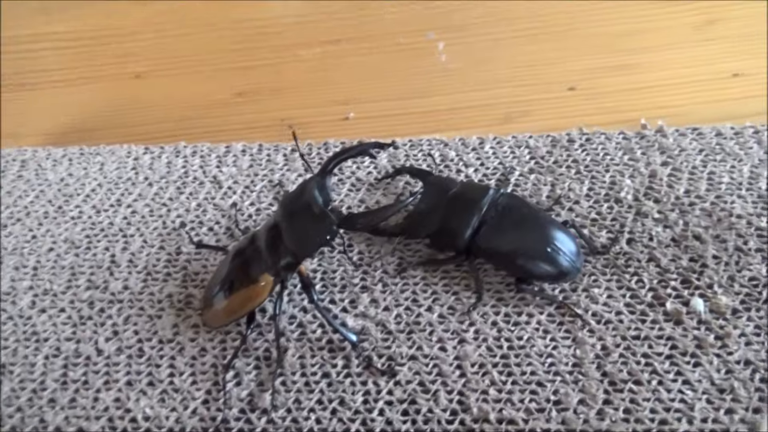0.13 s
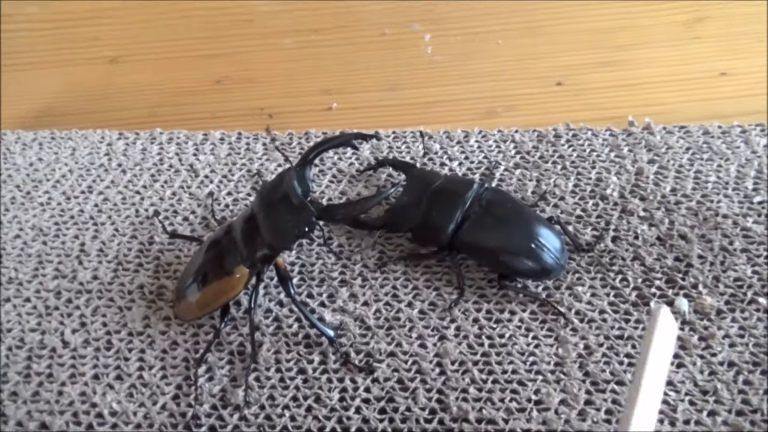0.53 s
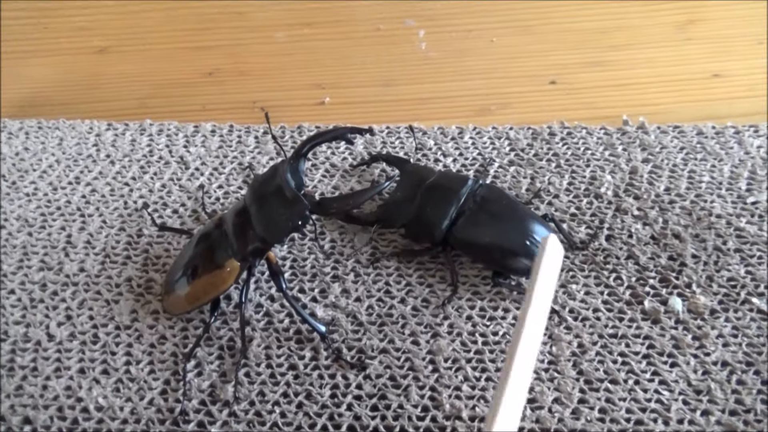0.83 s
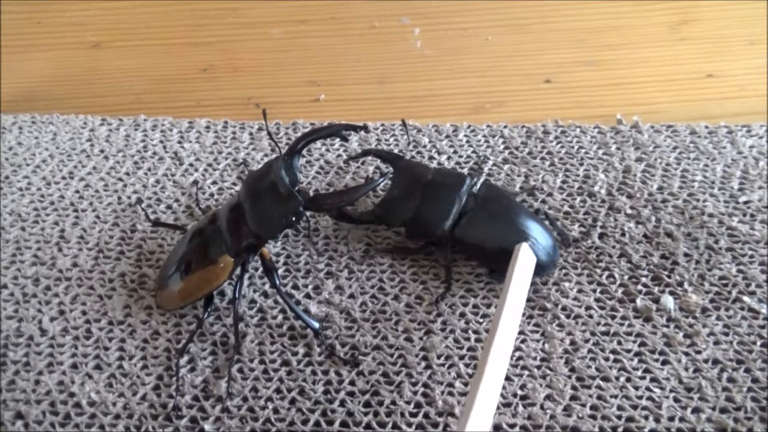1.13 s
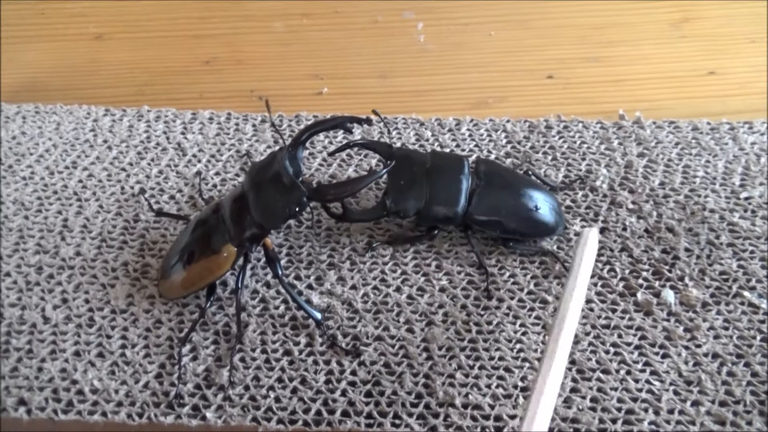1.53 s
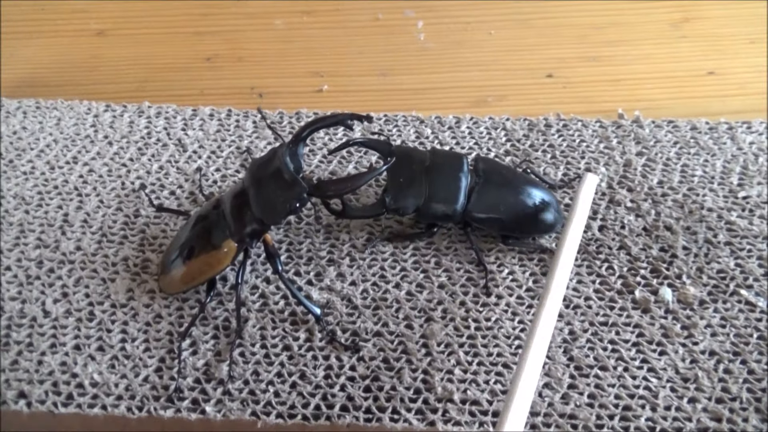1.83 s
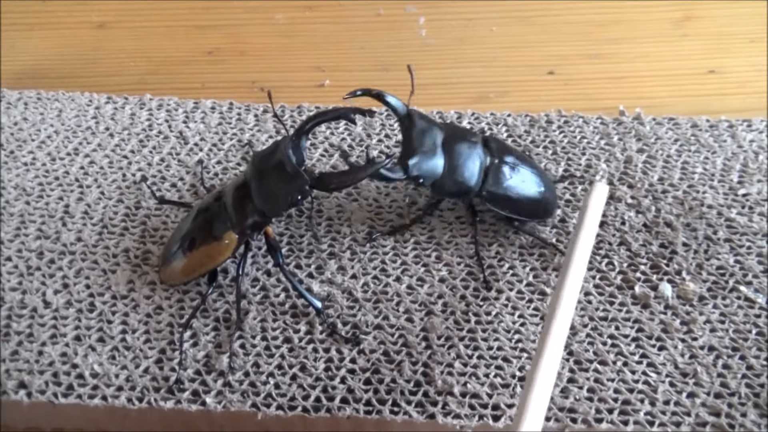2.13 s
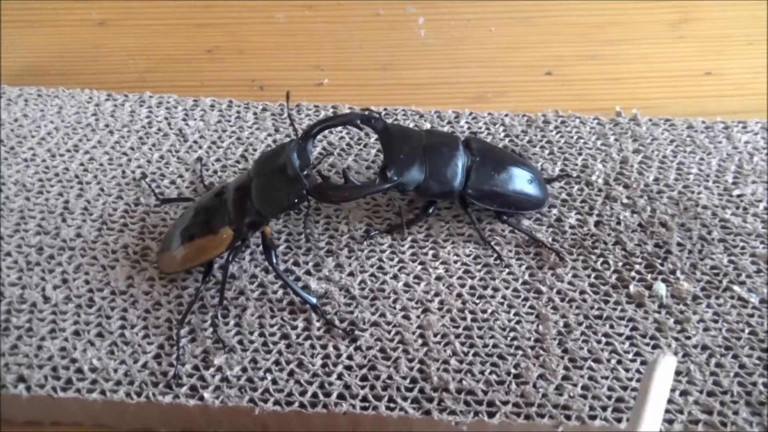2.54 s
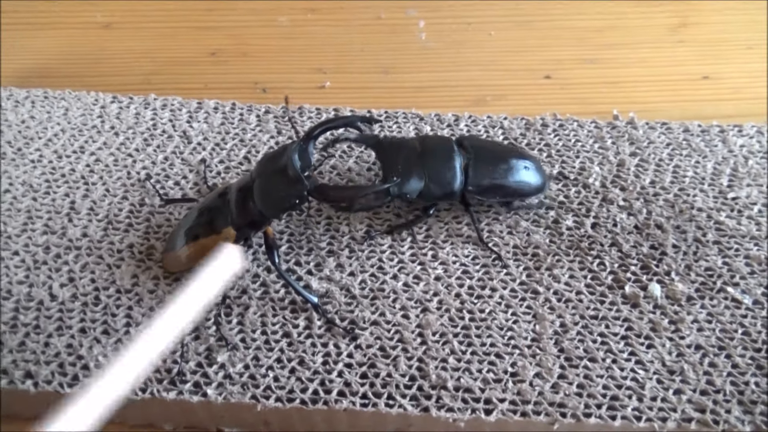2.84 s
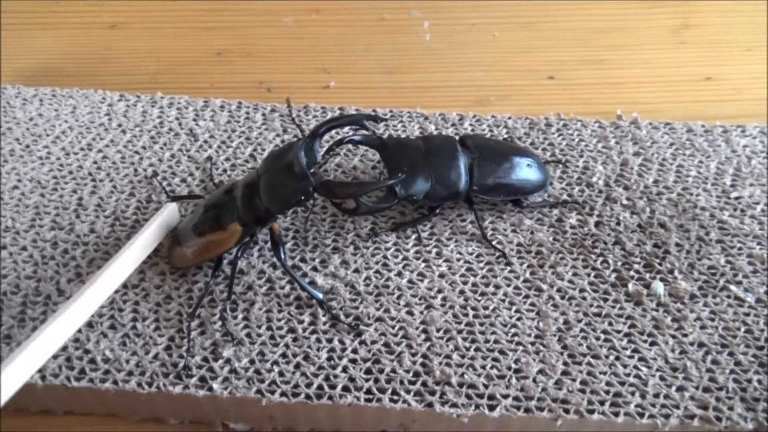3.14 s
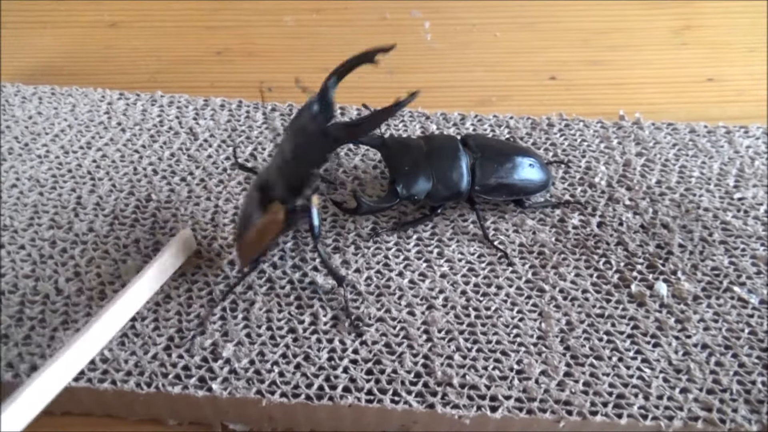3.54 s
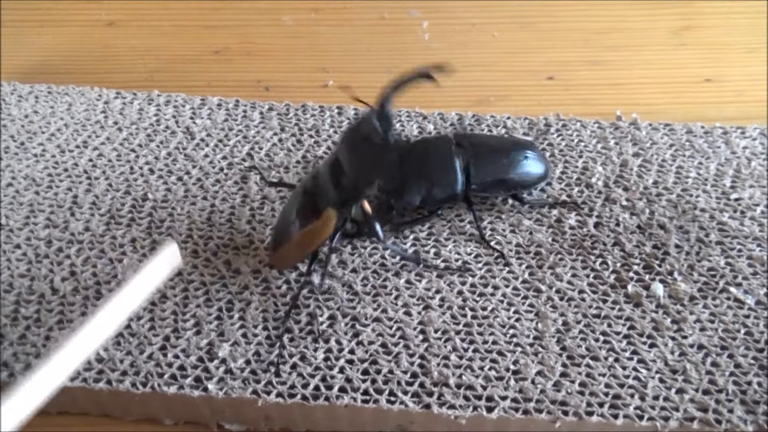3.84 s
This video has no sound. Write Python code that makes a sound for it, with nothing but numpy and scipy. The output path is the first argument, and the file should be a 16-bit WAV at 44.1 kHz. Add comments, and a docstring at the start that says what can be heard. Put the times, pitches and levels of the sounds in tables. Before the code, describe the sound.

Beetle claws and a prodding stick rasp briefly over coarse weave, jaws and shells tick sharply, and light shoves knock the table. Mostly quiet early, crowded at the end, heard very close in a small, softly humming room.

```python
"""On a rough mat on a wooden table, two stag beetles wrestle while a stick prods them, close to the microphone.
Claws and stick rasp over the weave as coloured friction noise; hooked claws chatter in rows of ringing slips.
Jaws and shells click as short high rings, shoves thump the table's modes, and a rustle and faint squeak pass.
The room's dull rush, noise with wavering resonances, follows a hollow click and gradually grows."""
import sys
import numpy as np
from scipy import signal
from scipy.fft import rfft, irfft, next_fast_len
from scipy.io import wavfile
from scipy.ndimage import uniform_filter1d, map_coordinates

SR = 44100
rng = np.random.default_rng(int(sys.argv[2]) if len(sys.argv) > 2 else 0)


def put_to_file(sound):
    """Save the sound as 16-bit audio at rate SR, in the file named by the first command-line argument."""
    columns = np.atleast_2d(sound).T  # one column per channel
    safe = np.clip(columns, -1, 1)
    whole_steps = np.round(safe * 32767)
    wavfile.write(sys.argv[1], SR, whole_steps.astype(np.int16))


N = 176400

# claws and stick dragging over the weave [t/s, length/s, rasp level/dB, fizz level/dB]
SCRAPES = [(1.12, 0.05, -52, -50), (1.182, 0.011, -48.5, -55), (1.212, 0.082, -55, -72),
           (1.337, 0.054, -68, -68), (1.617, .043, -60, -78), (1.898, 0.025, -45.5, -54),
           (1.927, 0.093, -46, -57.5), (2.082, 0.0053, -40, -46), (2.135, 0.063, -47.5, -53),
           (2.193, 0.016, -46, -48), (2.232, 0.043, -51, -71), (2.352, 0.0058, -42.5, -43.5),
           (3.048, 0.024, -45, -58), (3.108, 0.082, -51.5, -68), (3.423, 0.033, -46.5, -57),
           (3.449, 0.039, -43, -47), (3.469, 0.0069, -31.5, -45), (3.479, 0.0039, -30.5, -35),
           (3.4899, 0.0088, -30.5, -36), (3.5, 0.031, -42, -58), (3.513, .005, -49, -37),
           (3.544, 0.055, -47.5, -58), (3.57, 0.0044, -67, -39), (3.603, 0.033, -45, -45),
           (3.72, 0.054, -42.5, -45), (3.77, 0.0036, -52, -23), (3.774, 0.01, -53, -24),
           (3.812, 0.015, -36.5, -44), (3.829, 0.019, -41, -37), (3.85, 0.043, -50, -52),
           (3.921, 0.0097, -45.5, -41), (3.9383, 0.0021, -41, -29), (3.963, 0.011, -45, -53),
           (3.9945, 0.019, -25, -29)]
# a hooked claw chattering across the fibres [t/s, length/s, level/dB, f/Hz]
SCRATCHES = [(2.080, 0.0052, -39, 3370), (1.952, 0.052, -57.5, 6500), (3.043, 0.013, -50.5, 4670),
             (3.171, .028, -55, 3800), (3.447, 0.023, -43, 5560), (3.472, .005, -32.5, 4240),
             (3.479, 0.0052, -42, 1380), (3.773, 0.015, -41, 4760), (3.8, 0.021, -45.5, 1660),
             (3.842, 0.0058, -44, 2700), (3.925, .012, -43, 3800), (3.995, 0.0088, -34.5, 3600)]
# hard contacts of jaws, claws and shells [t/s, ring level/dB, f/Hz, t60/s]
CLICKS = [(1.108, -40, 10000, .003), (1.1692, -22.5, 4500, 0.00046), (1.293, -50, 12300, .003),
          (1.8995, -24, 5050, 0.00045), (2.0862, -11.5, 11000, 0.0014), (2.1375, -27.5, 12100, 0.0026),
          (2.1497, -24, 11400, 0.0018), (2.1909, -13.5, 13100, 0.0019), (2.3545, -30.5, 3560, 0.0038),
          (2.3565, -29, 1580, 0.0043), (3.0595, -28, 2880, 0.003), (3.471, -13, 8000, 0.0012),
          (3.4795, -28, 8900, .0012), (3.4905, -18, 4020, 0.002), (3.515, -26, 3400, 0.015),
          (3.5202, -13.5, 7640, 0.00096), (3.564, -27, 4940, 0.0014), (3.5722, -22, 11900, .004),
          (3.6505, -17, 12900, 0.0024), (3.6616, -14.5, 9050, 0.00033), (3.6929, -17, 3440, 0.0017),
          (3.6935, -33, 2100, 0.012), (3.7155, -23.5, 4120, 0.00091), (3.744, -23, 12600, .002),
          (3.7499, -10, 10700, 0.002), (3.751, -9.5, 11600, 0.0013), (3.7705, -17, 9600, 0.0067),
          (3.8527, -10.5, 6830, 0.0015), (3.8867, -20.5, 8500, 0.00094), (3.9307, -12.5, 5070, 0.0007),
          (3.9601, -10.5, 11300, 0.00055)]
# shoves that reach the table [t/s, peak level/dB, f/Hz where the shove is strongest]
THUMPS = [(1.628, -31.5, 385), (2.033, -30, 220), (2.088, -28.5, 218), (2.149, -33, 225),
          (2.358, -42.5, 273), (2.517, -36.5, 267), (3.053, -33, 290), (3.470, -28, 366),
          (3.485, -20.5, 284), (3.565, -24, 245), (3.626, -32, 270), (3.74, -36, 284), (3.763, -31.5, 233),
          (3.855, -38, 256), (3.936, -36, 276)]
# modes of the table, before the push favours some of them [f/Hz, level/dB, t60/s]
TABLE_MODES = [(176, 1, 0.034), (212.8, -2.5, 0.17), (275.3, 0, 0.19), (322, 3, 0.054), (389, -12, 0.13),
               (540, -4, 0.022), (1002, -8.5, 0.11), (1814, -1, 0.022)]
# relative spectrum of the rough rasp [f/Hz, level/dB]
RASP_COLOUR = [(40, -50), (150, -23), (500, 1.5), (1000, 4.5), (1700, 6), (2400, 2.5), (3800, 1),
               (6200, 0.5), (9000, -3), (16000, -5.5)]
# relative spectrum of the bright fizz [f/Hz, level/dB]
FIZZ_COLOUR = [(1500, -73), (3500, -66), (4500, -6), (7500, -7), (9500, 4.5), (12500, 8), (15000, 0),
               (16500, 0.5)]
# spectrum of cracks and random ticks [f/Hz, level/dB]
CRACK_COLOUR = [(40, -45), (150, -30), (600, -16), (1700, -36), (2500, -5), (4000, 8.5), (7000, 4),
                (12000, 12), (16000, -1)]
# relative spectrum of the soft rustle [f/Hz, level/dB]
RUSTLE_COLOUR = [(300, -20), (1000, -2), (1600, 0.5), (3800, -7.5), (6500, -5.5), (9000, 0), (12500, 3),
                 (16000, -9)]
# swell of the rustle [t/s, level/dB]
RUSTLE_LEVEL = [(2.42, -76), (2.52, -54.5), (2.56, -54), (2.585, -45), (2.63, -52), (2.74, -52.5),
                (2.83, -68)]
# relative spectrum of the room's rush [f/Hz, level/dB]
ROOM_COLOUR = [(20, -31), (55, -15.5), (88, -12), (125, -7), (180, -3), (260, -1), (400, -6), (600, -9),
               (900, -12.5), (1250, -19), (1500, -14), (2100, -22.5), (3500, -24.5), (6000, -27),
               (10000, -30.5), (16000, -30)]
# resonances in the rush, against its noise [f/Hz, width/Hz, level/dB]
DRONE = [(93, 11, -12), (220.2, 8, -9.5), (282.5, 7.9, -10.5), (476, 11.4, -11), (1011, 39, -10.5)]
# course of the rush [t/s, level/dB]
RUSH_LEVEL = [(.1, -54), (.9, -52), (1.35, -50), (1.85, -49), (2.15, -47), (2.9, -46.5), (3.3, -47.5),
              (4, -46)]
# stereo width of the fight: side against mid [f/Hz, level/dB]
FIGHT_SIDE = [(150, -13), (300, -26), (2000, -40), (9000, -15), (15000, -39)]
# stereo width of the room: side against mid [f/Hz, level/dB]
ROOM_SIDE = [(30, -24), (250, -24), (1200, -13.5), (2500, -37), (9000, -10.5), (15000, -45)]

# friction: tiny slips over smooth noise
GRAINS_PER_S, GRAIN_SPREAD_DB, SMOOTH_SHARE = 1900, 3, 0.65
# a stroke: rise and release as shares of its length, and easing off along it
SCRAPE_RISE, SCRAPE_RELEASE, SCRAPE_SAG_DB = 0.36, 0.22, 4.5
# how strongly scraping shakes the table; rasp level above which it shakes no harder
SCRAPE_TABLE_DB, SHAKE_CEILING_DB = -1.5, -33
# changing colour and grip along a stroke
PATCH_DB, FLUTTER_DB, FLUTTER_PER_S = 1.5, 2.6, 170
# random ticks along a stroke: rate, boost over the stroke, stroke level above which they get no louder
TICKS_PER_S, TICK_DB, TICK_CEILING_DB = 51, 21, -60
SLIP_CYCLES = 16  # cycles until a slip has fallen by 60 dB
# differences from slip to slip; pitch change along a scratch
SLIP_SPREAD_DB, SLIP_SCATTER_OCT, SCRATCH_GLIDE_OCT = 3, 0.27, -0.2
CRACK_DB, CRACK_T60_S = -22.5, 0.019  # crack against the ring of its click
PUSH_S = 0.0014  # rise of a shove through the soft mat
SHOVE_OCTAVES, SHOVE_BROAD = 0.36, 0.23  # width of a shove's emphasis; share that reaches all modes
SQUEAK_S, SQUEAK_WIDTH_S, SQUEAK_HZ, SQUEAK_BAND_HZ = 0.23, 0.045, 6080, 420
SQUEAK_DB, SQUEAK_FIZZ_DB = -62.5, -61
WALLS_DB, WALLS_T60_S, WALLS_TOP_HZ = -10, 0.22, 7000  # the room swallows the treble above this
ONSET_S, ONSET_DB, ONSET_HZ, ONSET_T60_S, ONSET_CRACK_DB = .0697, -31.5, 864, 0.031, -30
WAVER_DB, WAVERS_PER_S = 1.5, 6.93  # each resonance of the rush comes and goes
BASS_LEAN = 0.093  # share of the bass added to the left and taken from the right
TOP_HZ = 16200  # middle of the top band edge


def scrapes():
    """Each stroke swells, sags and lets go; its rasp also shakes the table."""
    t, rasp, fizz = np.arange(N) / SR, np.zeros(N), np.zeros(N)
    for start, length, rasp_db, fizz_db in SCRAPES:
        u = (t - start) / length
        stroke = np.clip(u / SCRAPE_RISE, 0, 1) * amp(-SCRAPE_SAG_DB * np.clip(u, 0, 1))
        stroke *= np.exp(-np.clip((u - 1) / SCRAPE_RELEASE, 0, 20))
        rasp += amp(rasp_db) * stroke
        fizz += amp(fizz_db) * stroke

    slips = grit()
    grip = amp(FLUTTER_DB * np.clip(wobble(FLUTTER_PER_S), -2, 2))
    rough = colour(patchy(grip * slips), RASP_COLOUR)
    bright = colour(patchy(grip * (slips + rng.standard_normal(N))), FIZZ_COLOUR)
    friction = rasp * rough + fizz * bright

    tick_times = rng.random(N) < TICKS_PER_S / SR
    ticks = tick_times * amp(TICK_DB) * np.minimum(rasp + fizz, amp(TICK_CEILING_DB))

    ring = table_ring(lambda hz: 1)
    push = np.minimum(rasp, amp(SHAKE_CEILING_DB)) * grit()
    shake = signal.fftconvolve(push, ring / np.linalg.norm(ring))[:N]
    return friction + shaped(ticks, CRACK_COLOUR) + amp(SCRAPE_TABLE_DB) * radiated(shake)


def scratches(count=14):
    """A claw slips in quick uneven steps; each slip rings the leg at a slightly different pitch."""
    out, t = np.zeros(N), np.arange(SR // 10) / SR
    for start, length, db, hz in SCRATCHES:
        u = (np.arange(count)[:, None] + rng.random((count, 1))) / count  # place of each slip in the scratch
        detune, size = rng.standard_normal((2, count, 1))
        pitch = hz * 2 ** (SLIP_SCATTER_OCT * detune + SCRATCH_GLIDE_OCT * (u - .5))
        age = np.maximum(t - u * length, 0)
        rings = fade(age, SLIP_CYCLES / pitch) * np.sin(2 * np.pi * pitch * age)
        slips = np.sum(amp(SLIP_SPREAD_DB * size) * rings, axis=0)
        # same energy as a steady sound of this rms level and length
        add(out, start, amp(db) * slips * np.sqrt(length * SR) / np.linalg.norm(slips))
    return out


def clicks():
    """A hard contact rings briefly at its pitch and leaves a short broad crack."""
    out, t = np.zeros(N), np.arange(SR // 20) / SR
    noise = colour(rng.standard_normal(N), CRACK_COLOUR)
    for k, (start, db, hz, t60) in enumerate(CLICKS):
        ring = fade(t, t60) * np.sin(2 * np.pi * hz * t)
        crack = amp(CRACK_DB) * fade(t, CRACK_T60_S) * noise[k * len(t):][:len(t)]
        add(out, start, amp(db) * (ring + crack))
    return out


def thumps():
    """Shoves, softened by the mat, ring the table; each favours the modes near its own frequency."""
    out = np.zeros(N)
    for start, db, shove_hz in THUMPS:
        ring = table_ring(lambda hz: SHOVE_BROAD + np.exp(-(np.log2(hz / shove_hz) / SHOVE_OCTAVES) ** 2))
        rise = 1 - np.exp(-np.arange(len(ring)) / SR / PUSH_S)
        ring = radiated(ring * rise)
        add(out, start, amp(db) * ring / np.abs(ring).max())
    return out


def swish():
    """A soft rustle of friction noise swells and fades as the stick is drawn back."""
    level = np.interp(np.arange(N) / SR, *np.transpose(RUSTLE_LEVEL), left=-np.inf, right=-np.inf)
    return amp(level) * colour(grit() + rng.standard_normal(N), RUSTLE_COLOUR)


def squeak():
    """A faint, thin rubbing squeak: one narrow resonance with a little fizz."""
    swell = np.exp(-((np.arange(N) / SR - SQUEAK_S) / SQUEAK_WIDTH_S) ** 2 / 2)
    tone = amp(SQUEAK_DB) * band(SQUEAK_HZ, SQUEAK_BAND_HZ)
    return swell * (tone + amp(SQUEAK_FIZZ_DB) * colour(grit(), FIZZ_COLOUR))


def grit():
    """Friction as tiny slips of uneven size over smooth noise."""
    sizes = amp(GRAIN_SPREAD_DB * np.clip(rng.standard_normal(N), -2, 2))
    slips = (rng.random(N) < GRAINS_PER_S / SR) * sizes
    return unit(slips * rng.choice([-1, 1], N)) + SMOOTH_SHARE * rng.standard_normal(N)


def patchy(x):
    """The colour shifts at random as the contact point moves."""
    z = signal.stft(x, nperseg=256)[2]
    across_pitch = uniform_filter1d(rng.standard_normal(z.shape), size=5, axis=0)
    field = uniform_filter1d(across_pitch, size=9, axis=1)
    return signal.istft(z * amp(PATCH_DB * np.clip(unit(field), -2, 2)), nperseg=256)[1][:N]


def table_ring(weight, vary_db=1):
    """The table's answer to one push; weight(Hz) says how well each mode is driven."""
    t, ring = np.arange(SR // 4) / SR, 0
    for hz, db, t60 in TABLE_MODES:
        level = weight(hz) * amp(db + vary_db * rng.standard_normal())
        ring = ring + level * fade(t, t60) * np.sin(2 * np.pi * hz * t)
    return ring


def radiated(x, edge_hz=130):
    """The table radiates little deep bass."""
    return signal.sosfilt(signal.butter(2, edge_hz, "high", fs=SR, output="sos"), x)


def walls(x):
    """A short, weak, dull room tail: decaying noise with softened treble."""
    t = np.arange(SR // 4) / SR
    tail = rng.standard_normal(len(t)) * fade(t, WALLS_T60_S) * (t > .002)
    wet = signal.fftconvolve(x, tail / np.linalg.norm(tail))[:N]
    return filtered(wet, lambda f: 1 / np.hypot(1, f / WALLS_TOP_HZ))


def opening_click():
    """The sound cuts in with a hollow click: a decaying tone and a burst of noise."""
    out, t = np.zeros(N), np.arange(SR // 20) / SR
    crack = amp(ONSET_CRACK_DB) * fade(t, 0.02) * colour(rng.standard_normal(N), RASP_COLOUR)[:len(t)]
    tone = amp(ONSET_DB) * fade(t, ONSET_T60_S) * np.sin(2 * np.pi * ONSET_HZ * t)
    add(out, ONSET_S, crack + tone)
    return out


def room():
    """A dull rush of noise with a few wavering resonances."""
    drone = np.zeros(N)
    for hz, width, db in DRONE:
        waver = amp(WAVER_DB * wobble(WAVERS_PER_S))
        drone += amp(db) * unit(waver * band(hz, width))
    level = np.interp(np.arange(N) / SR, *np.transpose(RUSH_LEVEL))
    return amp(level) * (colour(rng.standard_normal(N), ROOM_COLOUR) + drone)


def amp(db):
    """Decibels to gain."""
    return 10 ** (np.asarray(db) / 20)


def unit(x):
    """Scale to rms 1."""
    return x / np.sqrt(np.mean(x ** 2) + 1e-20)


def fade(t, t60):
    """Exponential decay, 60 dB down at t60."""
    return np.exp(-np.log(1000) * t / t60)


def wobble(rate):
    """A smooth random curve, rate knots a second."""
    knots = rng.standard_normal(int(N * rate / SR) + 4)
    return map_coordinates(knots, [np.arange(N) * rate / SR])


def filtered(x, response):
    """Multiply the spectrum of x by a response of frequency."""
    m = next_fast_len(N + 8192)
    return irfft(rfft(x, m) * response(np.fft.rfftfreq(m, 1 / SR)), m)[..., :N]


def shaped(x, points):
    """Equalise x by (Hz, dB) points, joined along log frequency."""
    hz, db = np.transpose(points)
    return filtered(x, lambda f: amp(np.interp(np.log(f + 1), np.log(hz), db)))


def colour(x, points):
    """Equalise x by (Hz, dB) points, at rms 1."""
    return unit(shaped(x, points))


def band(hz, width_hz):
    """Noise in one resonance, at rms 1."""
    def resonance(f):
        return 1j * f * width_hz / (hz * hz - f * f + 1j * f * width_hz)
    return unit(filtered(rng.standard_normal(N), resonance))


def add(out, start, x):
    """Mix x into out at start seconds."""
    part = out[round(start * SR):][:len(x)]
    part += x[:len(part)]


def scene():
    """The fight is close and nearly mono; the bass of the mix leans a little left."""
    fight = scrapes() + scratches() + clicks() + thumps() + swish() + squeak()
    mid = fight + amp(WALLS_DB) * walls(fight) + room() + opening_click()
    quarter_turn = filtered(fight, lambda f: 1j)  # a phase shift spreads the fight evenly
    spread = shaped(quarter_turn, FIGHT_SIDE) + shaped(room(), ROOM_SIDE)
    side = spread + filtered(mid, lambda f: BASS_LEAN / (1 + (f / 380) ** 4))
    return np.array([mid + side, mid - side])


def record(dry):
    """Silence until just before the opening click; nothing above the top band edge."""
    opened = np.arange(N) / SR > ONSET_S - .001
    return filtered(dry * opened, lambda f: np.clip((TOP_HZ - f) / 400 + .5, 0, 1))


dry = scene()
out = record(dry)
put_to_file(out)
```